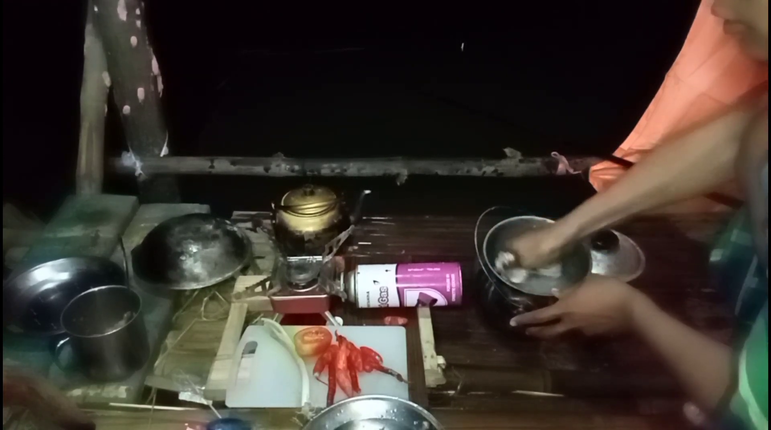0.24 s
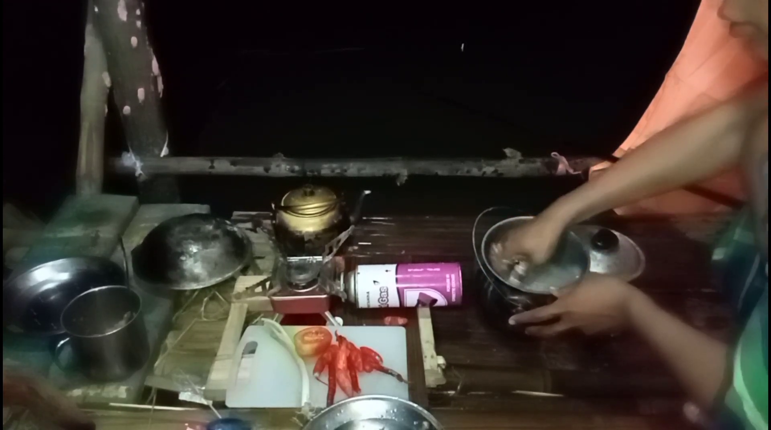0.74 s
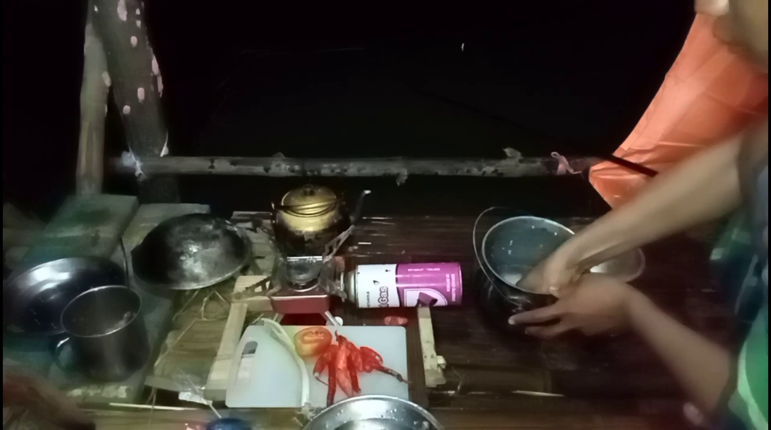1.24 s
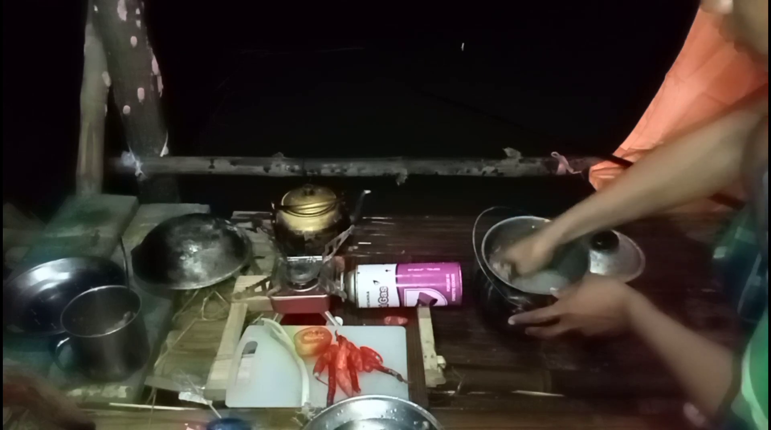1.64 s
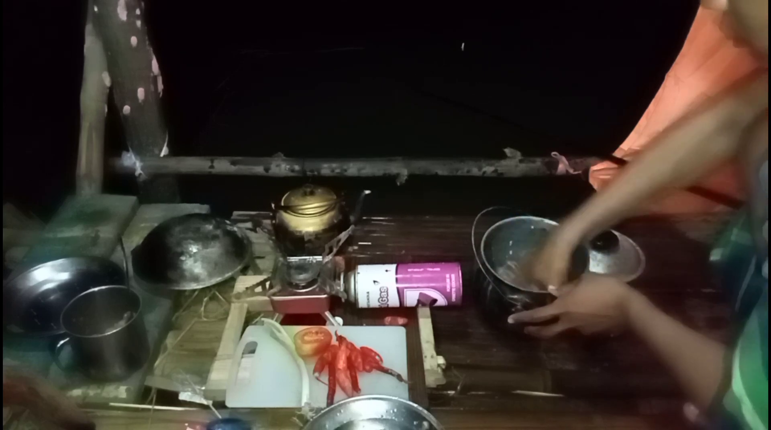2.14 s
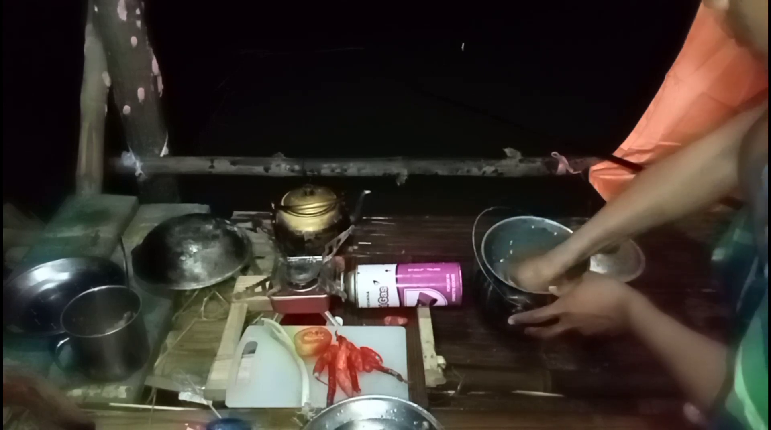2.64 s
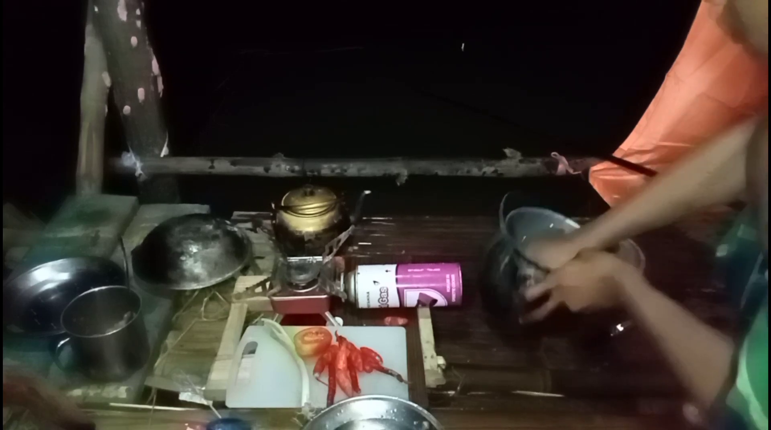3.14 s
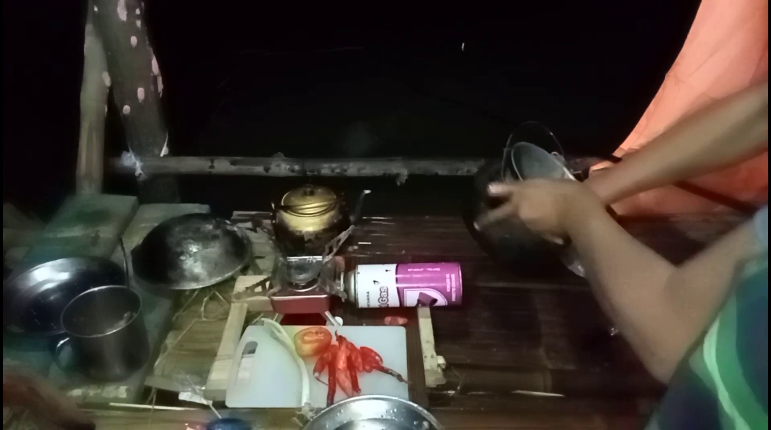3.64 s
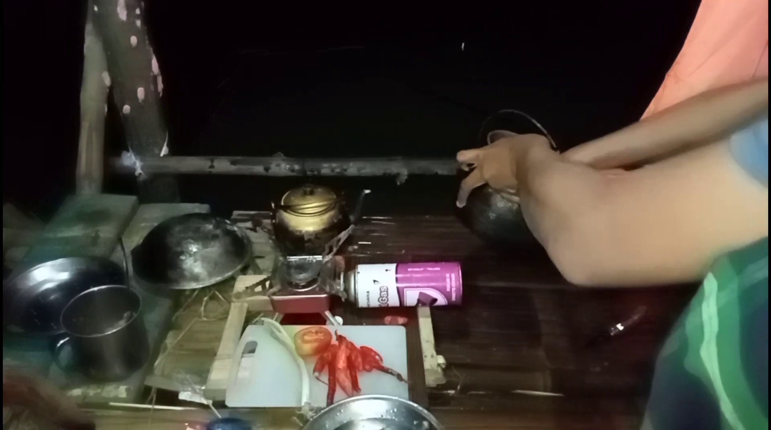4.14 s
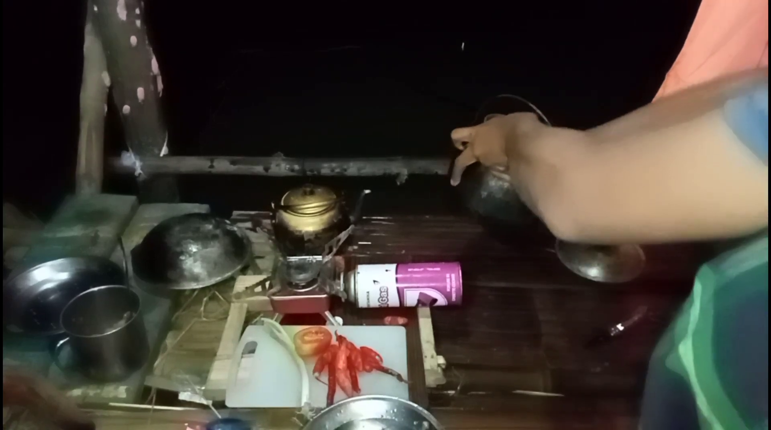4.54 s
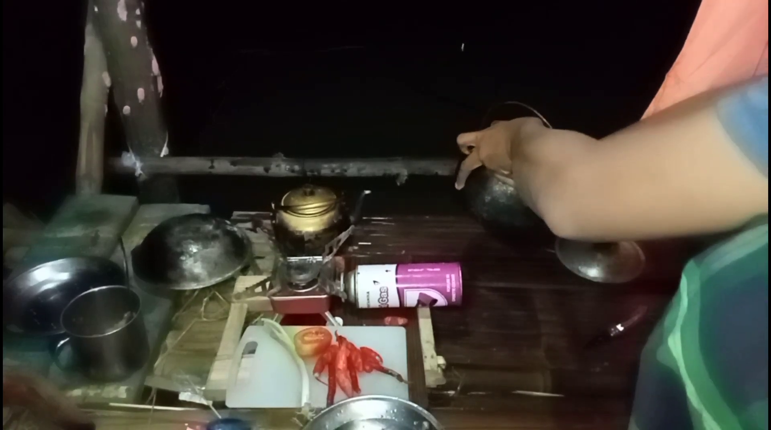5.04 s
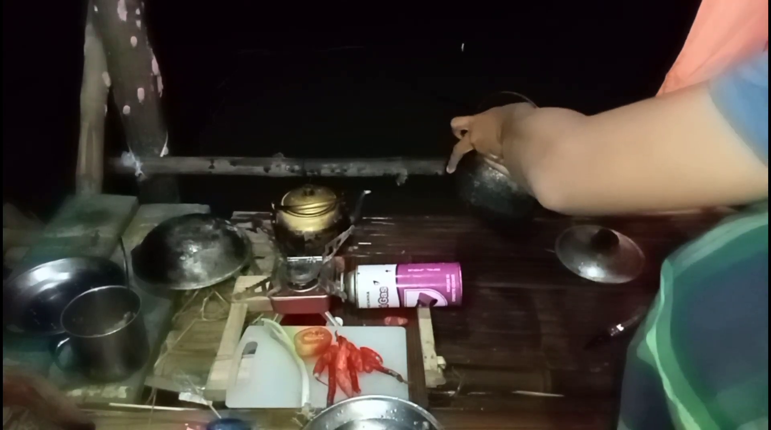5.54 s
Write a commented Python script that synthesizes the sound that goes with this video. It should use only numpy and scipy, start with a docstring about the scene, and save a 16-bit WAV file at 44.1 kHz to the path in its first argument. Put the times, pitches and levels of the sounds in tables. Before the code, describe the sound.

Gritty rice rubbing and light water sloshing in a metal pot outdoors at night, a dull floorboard thud late, crickets trilling throughout.

```python
"""Hands scrub and slosh rice in a metal pot of water on a wooden porch at night.
Rice is sparse clicks and noise in hissing bands; water is noise bursts, ringing air pockets and bubbles.
The pot wall and rim ring in decaying modes, floor boards thud as broad resonances, and a porch reflects.
Behind: a pulsed frog croak, a far low hoot, a chirping insect, crickets, still air and a low rumble."""
import sys
import numpy as np
from scipy import signal
from scipy.fft import rfft, irfft
from scipy.io import wavfile
from scipy.ndimage import uniform_filter1d

SR = 44100
rng = np.random.default_rng(int(sys.argv[2]) if len(sys.argv) > 2 else 0)


def master(y):
    """Save y as 16-bit WAV."""
    cut = np.clip(np.atleast_2d(y).T, -1, 1)
    pcm = np.round(cut * 32767)  # scale
    wavfile.write(sys.argv[1], SR, pcm.astype(np.int16))


N = 255339

# Slow stirring that never quite stops. Each row: time in seconds, hiss of grains in dB,
# sparkle against the hiss in dB, deep slosh in dB, light trickle in dB.
STIR = [(0.0, -58, -6, -66, -60), (.35, -58, -9, -66, -61.5), (0.7, -56, -6, -69, -59.5),
        (1.25, -61, -8, -65, -58.5), (1.5, -56.5, -6, -68, -57), (1.68, -58, -7, -65, -64),
        (1.95, -55, -4, -60.5, -60), (2.1, -57.5, -9, -66, -72), (2.5, -59.5, -7, -65, -55.5),
        (2.85, -59, -6, -64, -70), (3.05, -58, -8, -72, -63), (3.2, -51.5, -12, -61, -57),
        (3.68, -58, -7, -75, -72), (3.85, -56.5, -9, -65.5, -71), (4.3, -51.5, -9, -70, -50),
        (4.5, -59.5, -8, -72, -59.5), (4.62, -63, -16, -69, -71), (5.79, -61, -22, -70.5, -68)]
# Swishes of the fingers through the rice. Each row: start in seconds, length in seconds, hiss in dB,
# sparkle against the hiss in dB.
SWISHES = [(0.249, 0.033, -54, 1.5), (0.314, 0.026, -49.5, -11), (0.461, .012, -50, 0),
           (0.479, 0.023, -48.5, 0), (0.517, 0.027, -44, -2), (0.562, .035, -47, -2),
           (0.62, 0.017, -50, 2.5), (0.693, .04, -55.5, -2), (0.836, .03, -50.5, -4),
           (.912, 0.016, -51, -3), (0.99, 0.026, -45, -6), (1.035, 0.1, -49.5, -6), (1.32, .1, -56.5, -4),
           (1.52, 0.035, -54.5, -5), (1.69, .015, -60, 3), (1.737, 0.063, -44.5, -5),
           (1.809, 0.041, -47.5, -1.5), (1.997, .03, -51, -13), (2.096, 0.031, -51, -5),
           (2.194, 0.011, -53, 2), (2.294, 0.1, -51, -2.5), (2.386, 0.043, -50, -6),
           (2.587, 0.054, -53, -4), (2.898, .015, -55, 2.5), (2.947, 0.038, -45, -5), (3.0, .02, -51.5, -8),
           (3.083, .04, -52.5, -5), (3.325, 0.023, -51, -5), (3.395, .04, -45, -11),
           (3.496, 0.032, -46.5, -11), (3.619, 0.02, -50, -10), (3.701, 0.077, -48.5, -8),
           (3.88, 0.084, -49, -7), (4.041, 0.015, -42.5, -20), (4.117, 0.048, -46, -6),
           (4.196, 0.034, -46, -9), (4.29, 0.034, -47.5, -8), (4.437, 0.02, -56, -2),
           (4.87, 0.026, -49, -2), (4.5, .06, -61.5, -5), (5.03, 0.075, -57.5, -8), (5.2, .05, -58.5, -8),
           (5.44, 0.013, -50, -2.5), (5.62, 0.043, -53, -9), (5.692, .02, -58, -11)]
# Hiss of the rubbed grains. Each row: frequency in Hz, relative density in dB per Hz.
HISS = [(3240, -50), (5500, -13), (6030, -11.5), (6490, -5), (7220, 4), (8370, -6), (9350, -12.5),
        (10000, -21), (13000, -21), (22000, -120)]
# Highest part of the rub. Each row: frequency in Hz, relative density in dB per Hz.
SPARKLE = [(5590, -80), (9500, 7.5), (11900, -3), (13200, 2), (14800, 7), (15600, 6.5)]
# Lower part of the rub. Each row: frequency in Hz, relative density in dB per Hz.
FIZZ = [(1800, -46), (3000, 10), (4000, 3.5), (5500, -8.5)]
# Surges of water round the pot. Each row: start in seconds, length in seconds, deep slosh in dB,
# light trickle in dB.
SURGES = [(0.47, 0.031, -58, -54), (0.59, 0.052, -59.5, -52.5), (0.878, 0.048, -60, -61),
          (0.987, 0.1, -54, -46), (1.755, 0.083, -58, -56.5), (2.322, 0.098, -53, -46),
          (2.946, 0.052, -71, -49), (3.393, .03, -72, -51.5), (4.185, 0.027, -47.5, -48),
          (4.337, 0.056, -53, -44), (4.747, 0.064, -56, -61), (4.858, .05, -56.5, -56.5),
          (5.117, 0.024, -62, -51.5), (5.646, 0.037, -69, -55.5)]
# Sharp spatters of water. Each row: start in seconds, initial level in dB,
# tilt about 7200 Hz in dB per octave.
SPATTERS = [(0.4499, -46, 14), (0.5281, -33, 2), (0.5799, -29.5, 3.5), (0.631, -52, -8), (0.862, -42, 6),
            (0.915, -43, 15), (1.0053, -32.5, -4), (1.0827, -36.5, 8), (1.1157, -32, -7),
            (1.7763, -31.5, 5), (2.3146, -38, 6.5), (2.977, -35.5, 11), (3.233, -37, 2.2), (3.517, -53, 0),
            (3.6284, -45, -4), (4.0477, -36.5, 7.5), (4.119, -35.5, 13), (4.202, -32.5, -13),
            (4.273, -46, -3), (4.8795, -39, 16), (5.1304, -42, 5), (5.446, -41, 19)]
# Spectrum of a spatter before its tilt. Each row: frequency in Hz, relative level in dB.
SPATTER = [(600, 11), (1500, 1), (3000, 33.5), (5000, 2), (7200, 12.5), (10000, 0), (15000, -3)]
# Air pockets that ring in the water, and a few clean rings of the pot wall, as near 1900 Hz and at 3.237 s.
# Each row: start in seconds, level in dB, pitch in Hz, t60 in seconds.
PLOPS_AND_RINGS = [(.004, -37, 1270, 0.076), (.06, -58, 830, 0.19), (0.5282, -29, 2170, .032),
                   (0.64, -48, 1910, 0.28), (1, -30, 1977, 0.064), (1.0009, -23, 1310, 0.033),
                   (1.0204, -39, 1500, 0.045), (1.043, -39.5, 860, 0.071), (1.051, -30, 1302, 0.12),
                   (1.102, -36.5, 519, 0.088), (1.1143, -32, 3970, 0.03), (1.1183, -35, 1215, 0.1),
                   (1.555, -48.5, 1207, 0.17), (1.927, -45, 1910, 0.11), (2.3151, -33.5, 1325, 0.074),
                   (2.3531, -38, 1570, 0.052), (2.372, -41.5, 706, .18), (2.404, -31.5, 654, 0.088),
                   (2.4184, -44.5, 1190, 0.27), (2.9743, -30, 1930, 0.038), (3.182, -49, 1244, 0.22),
                   (3.2369, -26, 1220, 0.038), (3.237, -33, 1891, .1), (3.4017, -44, 1270, 0.073),
                   (3.518, -46, 1240, 0.16), (3.63, -40, 1060, 0.039), (3.7, -47.5, 1425, 0.081),
                   (3.79, -51, 1260, 0.11), (3.8332, -46, 1246, .09), (3.912, -49, 1225, .12),
                   (4.0428, -23.5, 1230, 0.037), (4.1001, -42, 1244, 0.14), (4.117, -28, 760, 0.019),
                   (4.138, -21.5, 2320, .02), (4.16, -37.5, 1173, 0.11), (4.203, -41, 1770, .06),
                   (4.205, -27.5, 532, 0.095), (4.222, -26.5, 1240, 0.085), (4.2694, -39, 4500, 0.044),
                   (4.273, -25, 1260, .045), (4.295, -44, 874, 0.19), (4.2994, -35, 3630, 0.042),
                   (4.329, -32, 3880, 0.061), (4.342, -27, 1253, 0.057), (4.344, -31.5, 1063, 0.081),
                   (4.358, -28, 704, 0.048), (4.3693, -18.5, 1253, 0.041), (4.369, -33, 1540, 0.062),
                   (4.9114, -37, 1247, 0.057), (4.929, -48, 876, 0.087), (5.1096, -37.5, 1184, 0.093),
                   (5.1366, -29, 1151, 0.088), (5.1374, -35.5, 4300, 0.03), (5.104, -41, 1720, .05),
                   (5.146, -41, 1700, .06), (5.288, -46, 750, .05), (5.1708, -37.5, 1177, .08),
                   (5.519, -42, 1240, .056), (5.644, -37, 3860, 0.064), (5.682, -36, 2170, .055),
                   (5.6894, -37, 3470, .05)]
# Single hard grains that strike the wall. Each row: start in seconds, direct peak in dB.
TICKS = [(0.4673, -36), (0.5267, -39), (0.558, -34), (0.5806, -40), (0.6335, -30), (0.9173, -36),
         (1.0011, -25), (1.0839, -37), (1.1124, -31.5), (1.7769, -21), (2.2009, -41), (2.3141, -39),
         (2.9093, -40), (3.2345, -34), (4.0477, -20.5), (4.118, -31), (4.2028, -41), (4.8778, -33),
         (4.883, -35), (5.4455, -38)]
# Knocks on the pot wall. Each row: start in seconds, level in dB, tuning factor as the water shifts,
# brightness about the third mode in dB per octave, ring length factor.
KNOCKS = [(.477, -43.5, 1.03, -4, 0.84), (0.922, -52.5, .99, -11, 1.2), (1.754, -40.5, 1, -3.5, 0.81),
          (3.13, -45, 0.89, 9, 0.16), (3.236, -42, 0.94, -1, 0.36), (3.398, -50.5, 0.93, 11, 1.4),
          (3.54, -42.5, 0.99, 3, 1.1), (3.62, -51, 1.1, 6, 1), (3.65, -62, 0.91, -17, 0.51),
          (3.734, -47.5, 0.97, -2, 0.44), (3.774, -53, 0.91, 15, 0.8), (3.81, -53, 1.23, 10, 0.46)]
# Modes of the wall before a knock's factors. Each row: frequency in Hz, level in dB, t60 in seconds.
POT = [(350, -6., .15), (868, -6., .15), (884, 0., .22), (1240, -6., .12), (1900, -12., .1)]
# Hard clinks against the rim. Each row: start in seconds, level in dB,
# brightness about the first mode in dB per octave.
CLINKS = [(0.9963, -12.5, -12), (1.0019, -18.5, -1.3), (4.0456, -37, 18), (4.0478, -34.5, 20.5)]
# Modes of the rim. Each row: frequency in Hz, level in dB, t60 in seconds (ring() uses at least 0.01).
RIM = [(2980, -2.5, 0.0087), (5910, -28, 0.033), (7155, -10.5, 0.006)]
# Dull bumps on the floor boards. Each row: start in seconds, peak in dB, t60 of the push in seconds,
# brightness about the second board resonance in dB per octave.
BUMPS = [(0.859, -65, 0.094, -8), (0.921, -46.5, 0.16, -4), (1.617, -48, 0.078, 3), (3.619, -50, 0.077, 25),
         (4.676, -32, 0.28, -1), (4.7, -29.5, 0.13, -0.5), (4.72, -32, 0.052, 0), (4.787, -28, 0.026, 0.5),
         (4.798, -34, 0.21, -1.5), (4.826, -41, 0.22, -5)]
# Resonances of the boards. Each row: frequency in Hz, pole width in Hz, level in dB.
BOARDS = [(193, 65, -2.5), (276, 106, -1.5), (574, 130, -7), (747, 94, -11.5), (1517, 91, -18)]
# Croaks of the frog. Each row: start in seconds, length in seconds, level in dB.
CROAKS = [(0., 0.18, -54.5), (0.174, 0.11, -52), (.36, .14, -51.5), (0.564, 0.17, -54),
          (0.759, 0.13, -53.5), (0.972, 0.066, -49), (1.17, 0.13, -53), (1.35, 0.14, -54.5),
          (1.547, .11, -53.5), (1.722, 0.14, -54.5), (1.92, 0.11, -52), (2.11, 0.11, -52.5),
          (2.288, 0.125, -49.5), (2.49, .12, -55), (2.667, 0.1, -54), (5.37, 0.047, -55.5),
          (5.512, 0.02, -55), (5.67, .11, -57.5)]
# A soft low hoot far away. Each row: start in seconds, length in seconds, level in dB.
HOOTS = [(3.58, .11, -58.5), (5.225, 0.13, -61.5)]
# Crickets. Each row: carrier in Hz, pole width of the waver in Hz, pulses per second, pulse sharpness,
# level in dB, swell in dB rms (its sign only flips the chance).
CRICKETS = [(2983, 44, 85, 1, -47.5, -0.5), (3202, 47, 120, 0.8, -50, 0.5),
            (2966, 433, 160, 0.12, -46, -1.86), (3188, 310, 120, 0.2, -47.5, 2.2),
            (2360.5, 140, 110, 0.28, -52.5, 1.5), (2225, 200, 82, 0.067, -51, 2),
            (3616, 140, 63, 0.15, -68.5, 4), (7690, 500, 89, 0.12, -65.5, 2),
            (8900, 550, 110, 0.12, -64.5, -0.5)]
# Still air. Each row: frequency in Hz, relative density in dB per Hz.
AIR = [(330, 2), (700, -3), (1110, -9.5), (1500, 10.5), (1900, -5.5), (4200, -15), (6200, -4.5),
       (9500, -31), (11000, -51), (12300, -13), (15600, -17.5)]
# Low rumble. Each row: frequency in Hz, relative density in dB per Hz.
RUMBLE = [(15, -72), (25, -38), (27, -28), (39, -21.5), (54, -14.5), (96, -2), (113, 1.5), (177, -7),
          (195, -10.5), (261, -18.5), (366, -23), (394, -29), (450, -43), (580, -69), (990, -120)]

SWISH_RISE_SHARE, SWISH_T60_S, FIZZ_DB = 0.31, 0.2, -3  # rise as a share of length; fizz against hiss
SURGE_RISE_S, SURGE_T60_S = 0.015, 0.24
SPATTER_T60_S = 0.043
ROUGH_LOW, ROUGH_PER_OCTAVE = .15, .45  # rows above 2 kHz are shaken more
TICK_HZ, TICK_WIDTH_HZ, TICK_T60_S = 7500, 1740, 0.0029
CRACK_DB, CRACK_DB_PER_DB, CRACK_T60_S = -4, 0.36, 0.092  # against a knock of -44 dB; harder cracks more
FROG_HZ, FROG_WIDTH_HZ, FROG_PULSES_PER_S = 1454, 47, 55
CROAK_RISE_S, CROAK_T60_S = 0.0031, 0.055
HOOT_HZ, HOOT_EDGE_S = 374, 0.016
CHIRP_HZ, CHIRP_WIDTH_HZ, CHIRP_DB = 5680, 260, -73.5
CHIRP_FIRST_S, CHIRP_EVERY_S = .22, 0.23
CHIRP_PULSE_EVERY_S, CHIRP_PULSE_S, CHIRP_PULSES = .028, .005, 4
AIR_DB, RUMBLE_DB = -60.5, -45.5
EDGE_HZ = 15650


def gain_of(db):
    """Decibels to an amplitude factor."""
    return 10 ** (np.asarray(db) / 20)


def decay(t, t60_s):
    """Exponential fall of 60 dB in t60_s."""
    return gain_of(-60 * t / t60_s)


def evened(x):
    """Scales to an rms of one."""
    return x / np.sqrt(np.mean(x ** 2) + 1e-20)


def add(mix, start_s, sound):
    """Mixes a sound in at a time, cut at the end of the mix."""
    part = mix[round(start_s * SR):][:len(sound)]
    part += sound[:len(part)]


def coloured(x, points):
    """Shapes a sound by a spectrum, falling a further 40 dB per octave outside its ends; rms one."""
    f, db = np.transpose(points)
    hz = np.fft.rfftfreq(len(x), 1 / SR) + 1
    shape_db = np.interp(np.log(hz), np.log(f), db)
    shape_db -= 40 * np.maximum(np.log2(f[0] / hz), 0)
    shape_db -= 40 * np.maximum(np.log2(hz / f[-1]), 0)
    return evened(irfft(rfft(x) * gain_of(shape_db), len(x)))


def resonate(x, hz, width_hz):
    """Shifts hz down to zero, smooths twice, and shifts back: a steep resonance."""
    turn = np.exp(2j * np.pi * hz * np.arange(len(x)) / SR)
    pole = np.exp(-np.pi * width_hz / SR)
    once = signal.lfilter([1 - pole], [1, -pole], x / turn)
    twice = signal.lfilter([1 - pole], [1, -pole], once)
    return 2 * (turn * twice).real


def drift(seconds):
    """Slow chance: noise averaged twice over a window, rms one."""
    size = int(seconds * SR)
    return evened(uniform_filter1d(uniform_filter1d(rng.standard_normal(N), size), size))


def grains(per_s, spread_db):
    """Sparse clicks of random sign; with a spread, a few are large."""
    size_db = spread_db * np.minimum(rng.exponential(1, N), 4)
    size = gain_of(size_db) * rng.choice([-1., 1.], N)
    return size * (rng.random(N) < per_s / SR)


def ring(hz, t60_s, glide=0., rise_s=0.0003):
    """A dying tone with a soft start, gliding in octaves per second for its first 0.1 s."""
    t = np.arange(SR // 2) / SR
    turns = np.cumsum(hz * 2 ** (glide * np.minimum(t, .1))) / SR
    return decay(t, max(t60_s, .01)) * (1 - np.exp(-t / rise_s)) * np.sin(2 * np.pi * turns)


def swell(start_s, length_s, rise_s, t60_s):
    """Rises and holds for length_s in all, then dies away; zero before its start."""
    t = np.arange(N) / SR - start_s
    return np.clip(t / rise_s, 0, 1) * decay(np.clip(t - length_s, 0, 1), t60_s)


def stir_level(column):
    """Amplitude of the stirring over time, its dB interpolated between rows."""
    return gain_of(np.interp(np.arange(N) / SR, np.transpose(STIR)[0], column))


def rice():
    """Grains tick against each other and the wall over a steady rub, in three bands of hiss."""
    _, hiss_db, sparkle_db, _, _ = np.transpose(STIR)
    hiss, sparkle = stir_level(hiss_db), stir_level(hiss_db + sparkle_db)
    for start_s, length_s, db, bright_db in SWISHES:
        shape = gain_of(db) * swell(start_s, length_s, SWISH_RISE_SHARE * length_s, SWISH_T60_S)
        hiss = np.maximum(hiss, shape)
        sparkle = np.maximum(sparkle, gain_of(bright_db) * shape)
    clumps = gain_of(1.04 * drift(0.023))  # grains move in clumps
    wall = rng.standard_normal(1024) * decay(np.arange(1024) / SR, .022)  # dense high ring of the pot
    bands = ((HISS, hiss, .8), (SPARKLE, sparkle, 1.1), (FIZZ, gain_of(FIZZ_DB) * hiss, .8))
    out = np.zeros(N)
    for colour, level, grit in bands:
        clicks = evened(signal.oaconvolve(grains(300, 1.16), wall)[:N])
        clicks = clicks + 0.39 * evened(grains(120, 2.6))  # single hard grains
        rub = grit * coloured(clicks, colour) + coloured(rng.standard_normal(N), colour)
        out += level * evened(rub * clumps)
    return out


def bubbles(low_hz, high_hz, per_s, cycles):
    """Small air pockets of ten sizes, each rising in pitch; t60 is a fixed count of cycles."""
    total = np.zeros(N)
    for hz in np.geomspace(low_hz, high_hz, num=10):
        pocket = ring(hz, cycles / hz, 2.65)[:4000]
        total += signal.oaconvolve(grains(per_s, 3.64), pocket)[:N]
    return evened(total)


def stirred_water():
    """Small bubbles gurgle in the stirred water: a deep slosh and a light trickle."""
    _, _, _, slosh_db, trickle_db = np.transpose(STIR)
    slosh, trickle = stir_level(slosh_db), stir_level(trickle_db)
    for start_s, length_s, deep_db, light_db in SURGES:
        shape = swell(start_s, length_s, SURGE_RISE_S, SURGE_T60_S)
        slosh = np.maximum(slosh, gain_of(deep_db) * shape)
        trickle = np.maximum(trickle, gain_of(light_db) * shape)
    return slosh * bubbles(413.0, 1249, 20, 89.0) + trickle * bubbles(1183, 2073, 40, 66.0)


def spatters():
    """Each spatter is a burst of tilted noise that dies fast."""
    out, t = np.zeros(N), np.arange(8192) / SR
    for start_s, db, tilt_db in SPATTERS:
        colour = [(hz, d + tilt_db * np.log2(hz / 7200)) for hz, d in SPATTER]
        burst = coloured(rng.standard_normal(len(t)), colour)
        add(out, start_s, gain_of(db) * decay(t, SPATTER_T60_S) * burst)
    return out


def plops_and_rings():
    """Air pockets and a few pot wall rings: dying tones of wobbling pitch plus resonant noise."""
    out, t = np.zeros(N), np.arange(8192) / SR
    for start_s, db, hz, t60_s in PLOPS_AND_RINGS:
        noise = rng.standard_normal(len(t))
        rough = ROUGH_LOW + ROUGH_PER_OCTAVE * max(np.log2(hz / 2000), 0)
        wobble = evened(uniform_filter1d(noise, 150))
        turns = np.cumsum(hz * (1 + 0.028 * rough * wobble)) / SR
        tone = np.sin(2 * np.pi * turns) + rough * evened(resonate(noise, hz, 0.44 * hz))
        tone /= np.sqrt(1 + 2 * rough ** 2)  # about the same power at any roughness
        add(out, start_s, gain_of(db) * decay(t, t60_s) * (1 - np.exp(-t / 0.0015)) * tone)
    return out


def ticks():
    """A hard grain on the wall: a bright click with a blur of pitch."""
    out, t = np.zeros(N), np.arange(512) / SR
    for start_s, db in TICKS:
        noise = rng.standard_normal(len(t))
        click = decay(t, TICK_T60_S) * resonate(noise, TICK_HZ, TICK_WIDTH_HZ)
        add(out, start_s, gain_of(db) * click / abs(click).max())
    return out


def knocks():
    """Each knock rings the wall's modes, sagging as water climbs the wall, and leaves a short dull crack."""
    out, t = np.zeros(N), np.arange(2048) / SR
    for start_s, db, tuning, bright_db, length in KNOCKS:
        for hz, mode_db, t60_s in POT:
            tilt_db = bright_db * np.log2(hz / POT[2][0])
            mode = ring(hz * tuning, t60_s * length, -0.41, 0.0044)
            add(out, start_s, gain_of(db + mode_db + tilt_db) * mode)
        crack_db = db + CRACK_DB + CRACK_DB_PER_DB * (db + 44)
        crack = evened(resonate(rng.standard_normal(len(t)), 920, 2400))
        add(out, start_s, gain_of(crack_db) * decay(t, CRACK_T60_S) * crack)
    return out


def clinks():
    """Hard contacts ring the rim's short high modes."""
    out = np.zeros(N)
    for start_s, db, bright_db in CLINKS:
        for hz, mode_db, t60_s in RIM:
            tilt_db = bright_db * np.log2(hz / RIM[0][0])
            add(out, start_s, gain_of(db + mode_db + tilt_db) * ring(hz, t60_s, 0, .0001))
    return out


def porch(x):
    """A short spray of reflections from boards and pans: sparse random taps that decay."""
    t = np.arange(SR // 5) / SR
    taps = grains(2000, 0)[:len(t)] * decay(t, 0.11) * (t > .003)
    return signal.oaconvolve(x, taps / np.linalg.norm(taps))[:N]


def floor():
    """Scuffing bursts shake the boards' broad resonances."""
    out, t = np.zeros(N), np.arange(8192) / SR
    for start_s, db, t60_s, bright_db in BUMPS:
        push = (decay(t, t60_s) + 0.94 * decay(t, 0.0047)) * rng.standard_normal(len(t))
        boards = np.zeros(len(t))
        for hz, width_hz, board_db in BOARDS:
            tilt_db = bright_db * np.log2(hz / BOARDS[1][0])
            boards += gain_of(board_db + tilt_db) * resonate(push, hz, width_hz)
        add(out, start_s, gain_of(db) * boards / abs(boards).max())
    return out


def frog():
    """A narrow, hoarse pulsed croak about five times a second: a carrier with chance in both phases."""
    t = np.arange(N) / SR
    pulses = 1 + .5 * np.cos(2 * np.pi * (FROG_PULSES_PER_S * t + 0.62 * drift(0.29)))
    hoarse = 1 + 0.84 * (drift(.5 / FROG_WIDTH_HZ) + 1j * drift(.5 / FROG_WIDTH_HZ))
    voice = evened((hoarse * np.exp(2j * np.pi * FROG_HZ * t)).real * pulses)
    croaks = sum(gain_of(db) * swell(start_s, length_s, CROAK_RISE_S, CROAK_T60_S)
                 for start_s, length_s, db in CROAKS)
    return voice * croaks


def hoots():
    """Steady pure notes with soft ends."""
    tone = np.sqrt(2) * np.sin(2 * np.pi * HOOT_HZ * np.arange(N) / SR)
    return tone * sum(gain_of(db) * swell(start_s, length_s, HOOT_EDGE_S, 3 * HOOT_EDGE_S)
                      for start_s, length_s, db in HOOTS)


def chirper():
    """A faint high insect repeats chirps of a few quick pulses of narrow noise; the level drifts."""
    since_s = (np.arange(N) / SR - CHIRP_FIRST_S) % CHIRP_EVERY_S
    beats = np.zeros(N)
    for k in range(CHIRP_PULSES):
        centre_s = (k + .5) * CHIRP_PULSE_EVERY_S
        beats += np.exp(-((since_s - centre_s) / CHIRP_PULSE_S) ** 2)
    whistle = resonate(rng.standard_normal(N), CHIRP_HZ, CHIRP_WIDTH_HZ)
    return gain_of(CHIRP_DB + 1.35 * drift(0.45)) * evened(beats * whistle)


def crickets():
    """Wavering whistles of narrow noise, chopped into pulses of slightly uneven timing."""
    t, out = np.arange(N) / SR, np.zeros(N)
    for hz, width_hz, per_s, sharp, db, swell_db in CRICKETS:
        pulses = np.exp(sharp * np.cos(2 * np.pi * (per_s * t + .07 * drift(.2))))
        whistle = resonate(rng.standard_normal(N), hz, width_hz)
        out += gain_of(db + swell_db * drift(0.086)) * evened(pulses * whistle)
    return out


def still_air():
    """Steady shaped noise."""
    return gain_of(AIR_DB) * coloured(rng.standard_normal(N), AIR)


def rumble():
    """Low shaped noise whose level drifts."""
    return gain_of(RUMBLE_DB + 1.1 * drift(.05)) * coloured(rng.standard_normal(N), RUMBLE)


def scene():
    """Near sounds with their reflections over the night."""
    near = spatters() + plops_and_rings() + ticks() + knocks() + clinks()
    reflected = gain_of(-6.0) * porch(near)
    hand = rice() + stirred_water()
    night = crickets() + still_air() + rumble()
    return (hand + near + reflected + floor() + frog() + hoots() + chirper() + night)[None]


def record(dry):
    """Band limit: a linear-phase low-pass at EDGE_HZ."""
    low_pass = signal.firwin(511, EDGE_HZ, window=("kaiser", 9), fs=SR)
    return signal.oaconvolve(dry, low_pass[None], "same")


dry = scene()
out = record(dry)
master(out)
```